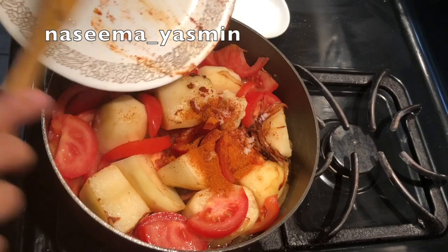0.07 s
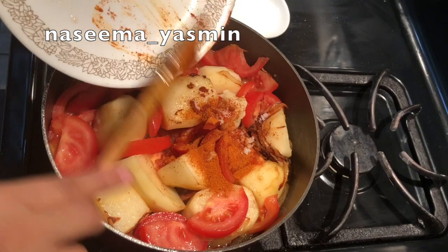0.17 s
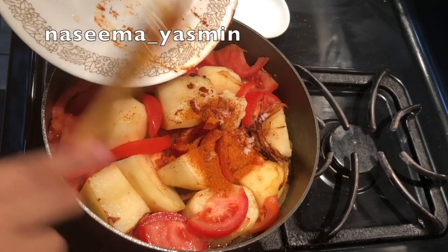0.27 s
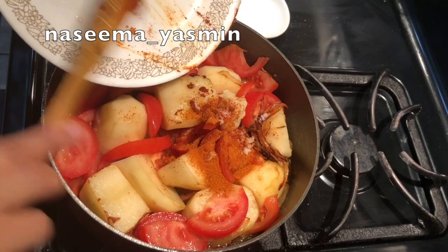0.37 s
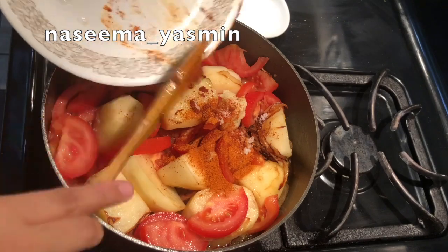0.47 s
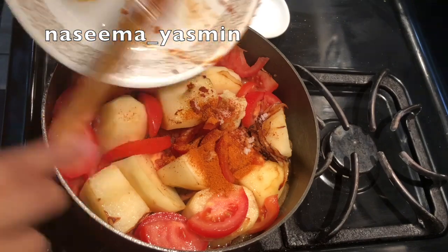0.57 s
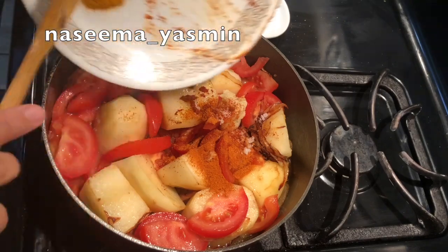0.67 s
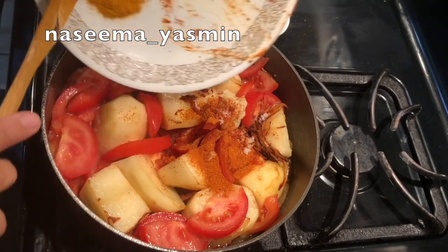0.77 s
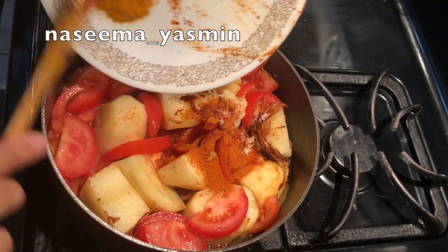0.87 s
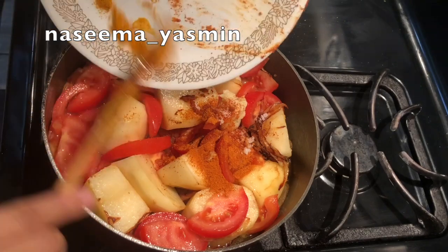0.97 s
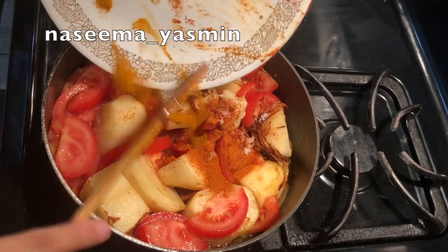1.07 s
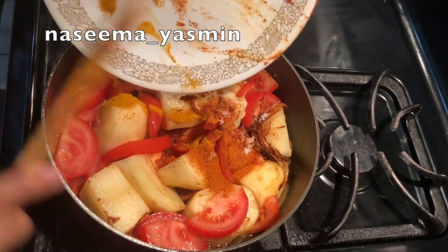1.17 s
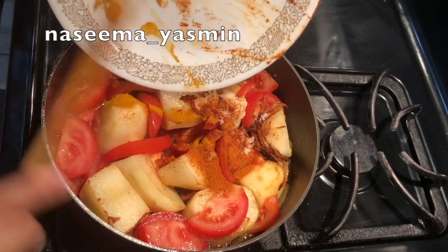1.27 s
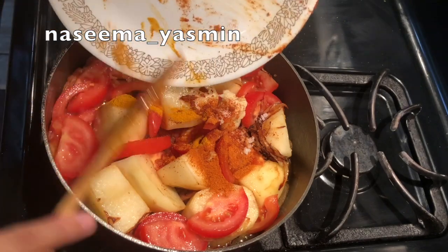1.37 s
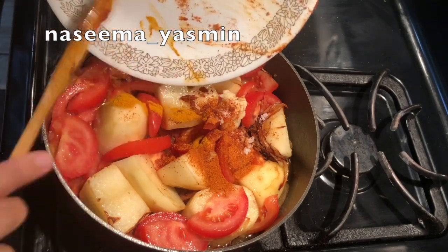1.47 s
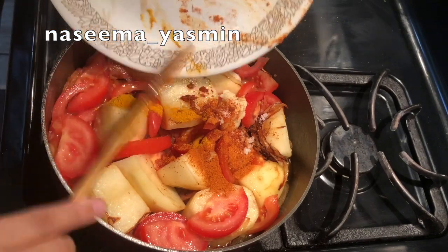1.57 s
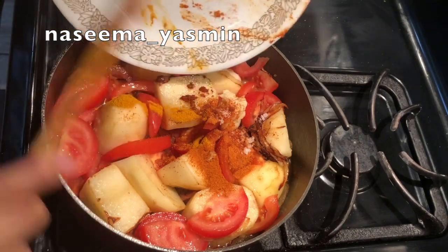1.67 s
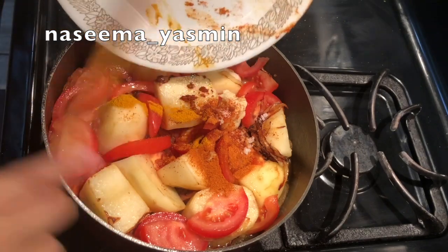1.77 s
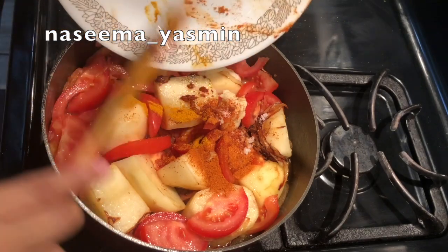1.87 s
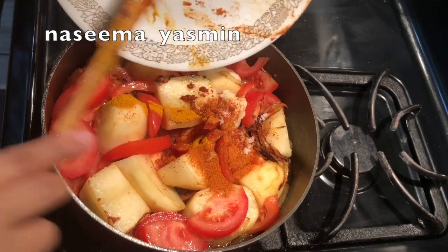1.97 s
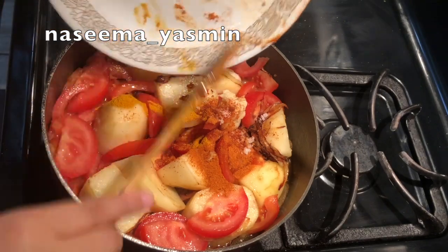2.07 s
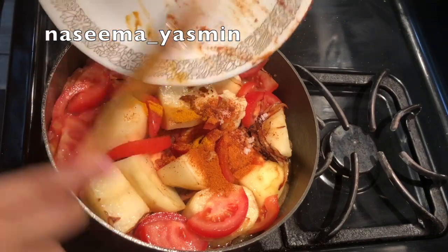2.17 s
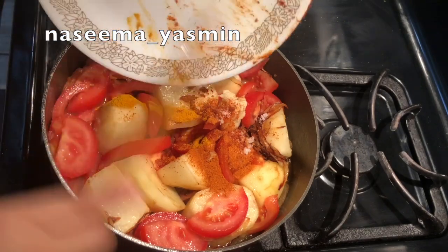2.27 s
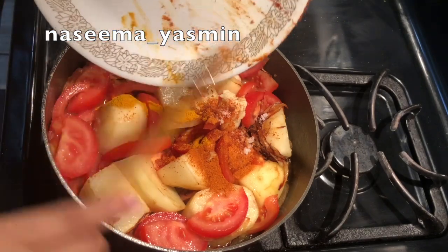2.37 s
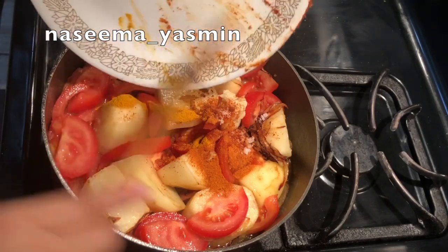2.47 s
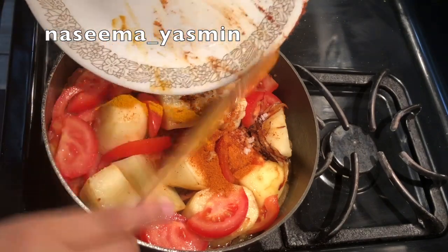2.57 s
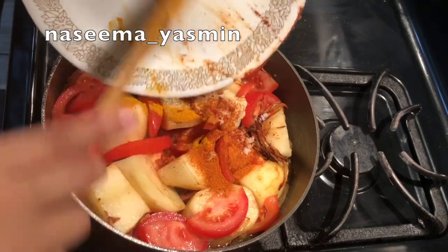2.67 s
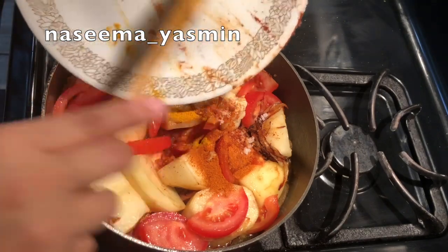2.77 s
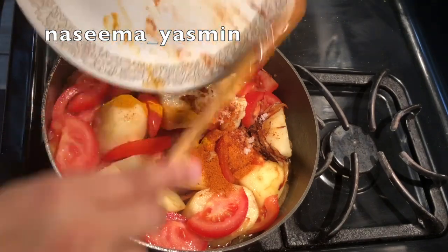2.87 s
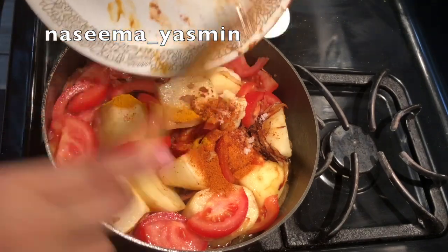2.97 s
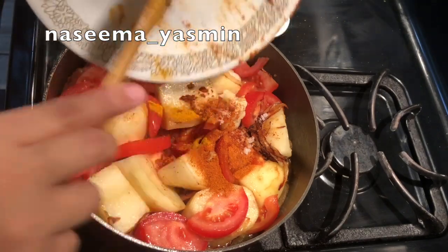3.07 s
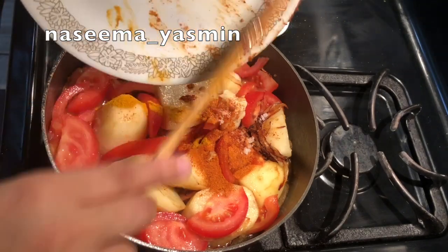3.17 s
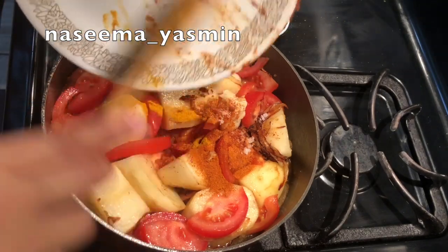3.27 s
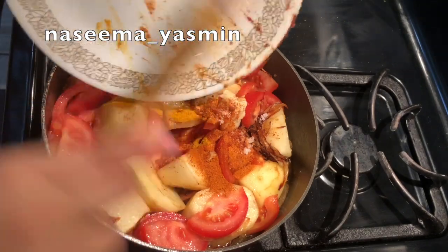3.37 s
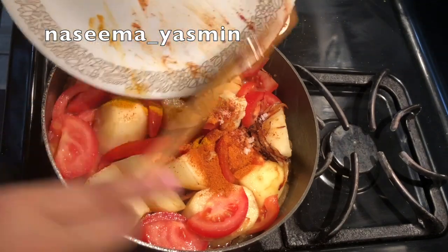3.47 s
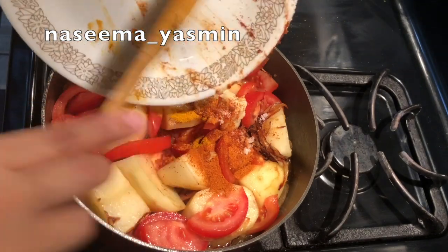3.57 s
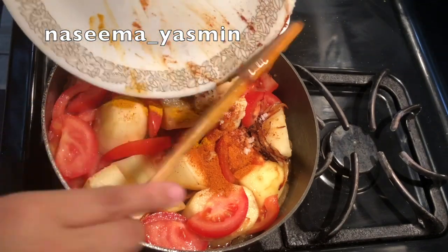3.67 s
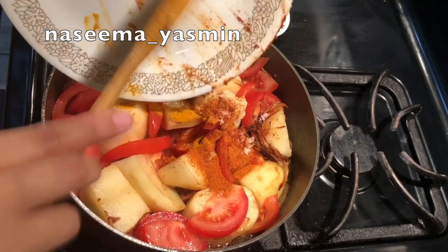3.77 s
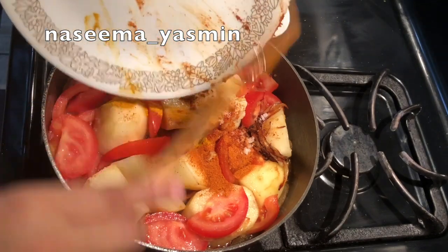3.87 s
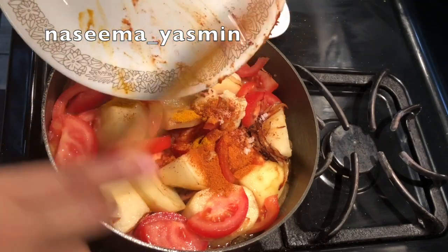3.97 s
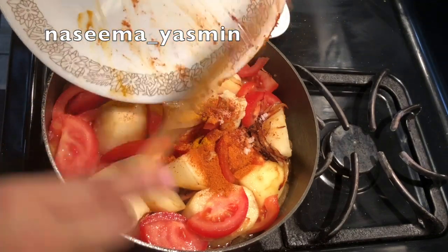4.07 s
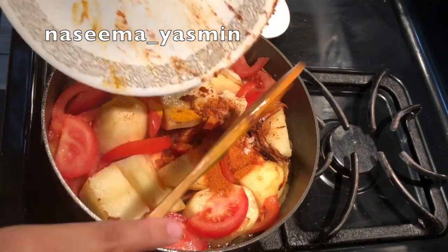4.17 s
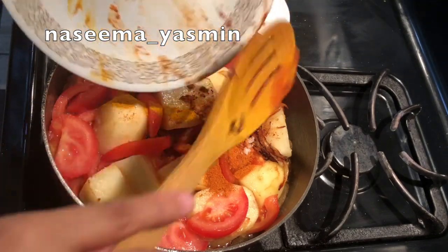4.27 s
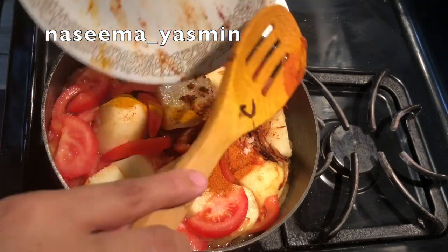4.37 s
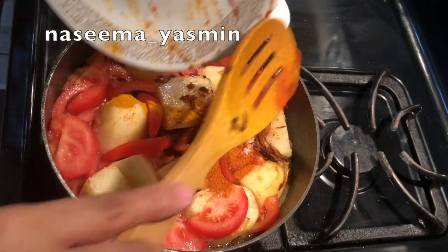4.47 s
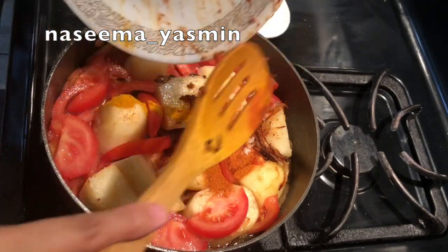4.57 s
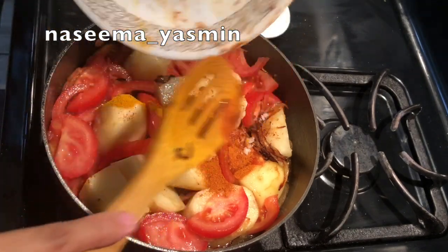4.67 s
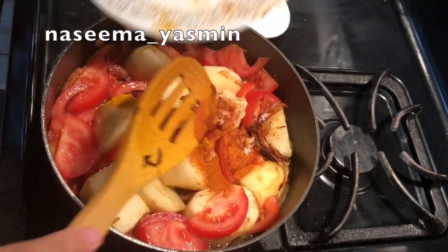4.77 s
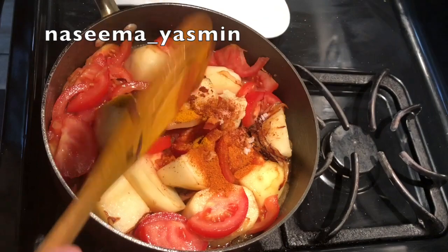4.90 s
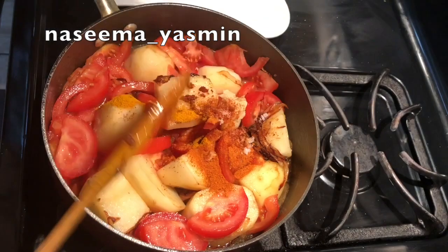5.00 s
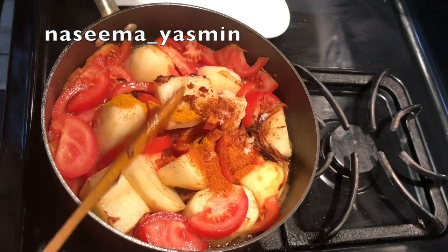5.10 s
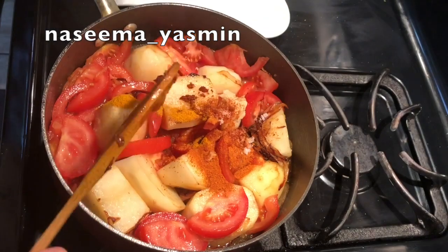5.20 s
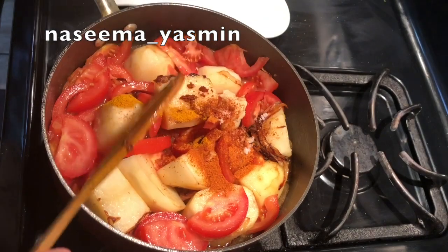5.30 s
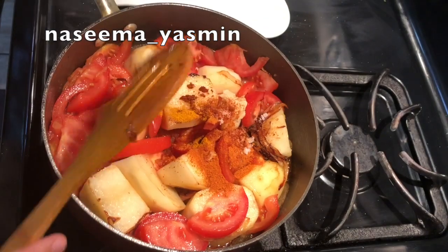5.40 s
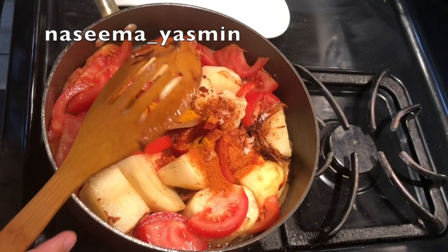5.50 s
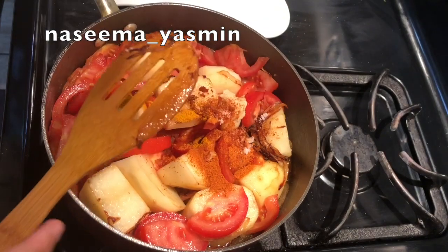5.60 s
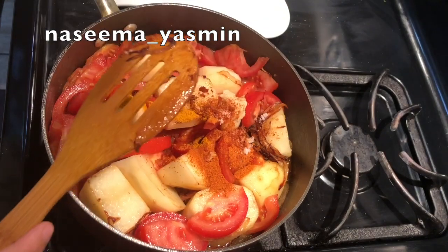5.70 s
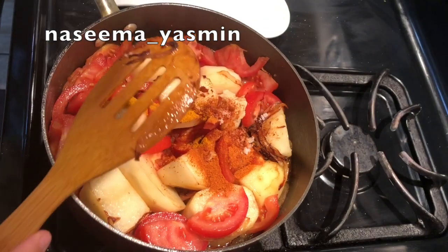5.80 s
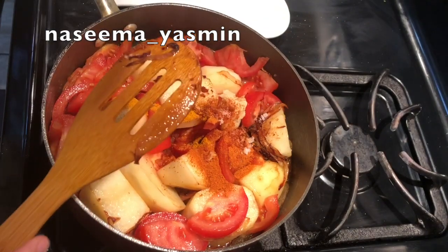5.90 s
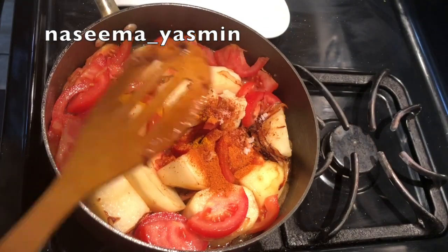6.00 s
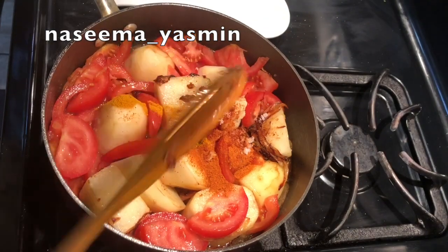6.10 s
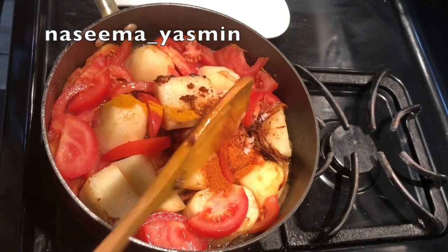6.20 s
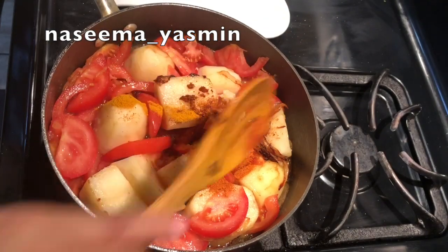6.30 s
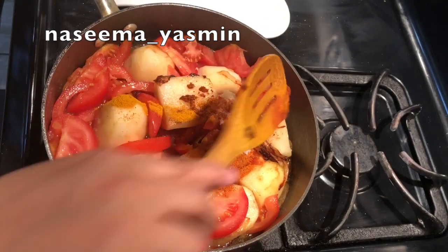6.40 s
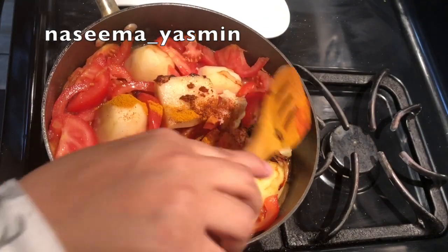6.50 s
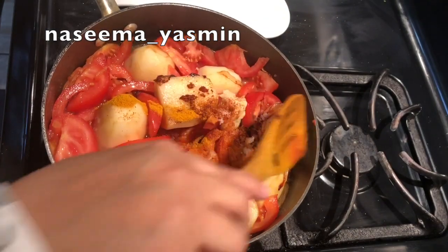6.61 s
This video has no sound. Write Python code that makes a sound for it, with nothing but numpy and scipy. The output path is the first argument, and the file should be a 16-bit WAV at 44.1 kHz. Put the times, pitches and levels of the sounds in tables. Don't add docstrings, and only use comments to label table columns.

```python
import sys
import numpy as np
from scipy import signal
from scipy.fft import rfft, irfft, next_fast_len
from scipy.io import wavfile
from scipy.ndimage import uniform_filter1d

SR = 44100
rng = np.random.default_rng(int(sys.argv[2]) if len(sys.argv) > 2 else 0)


def to_wav(s):
    ch = np.atleast_2d(s).T
    pcm = np.round(np.clip(ch, -1, 1) * 32767)
    wavfile.write(sys.argv[1], SR, pcm.astype(np.int16))


def field_ratio(decibels):
    return 10 ** (np.asarray(decibels, dtype=float) / 20)


N = 293255
CONTACT_DELAY_S = 0.00153
PRESS_DB_PER_S = 2200

# start_s, click_db, first_ring_db, second_ring_db, wood_db
TAP_EVENTS = [(0.132, -9, -13, -30, -34.5), (0.438, -8, -11, -28, -34), (1.292, -19, -29, -57, -30),
              (1.561, -12, -12, -29.5, -27), (1.809, -26, -7, -34.5, -25.5),
              (2.006, -2.5, -13, -25.5, -29.5), (2.125, -20, -27, -47, -58), (2.276, -26, -37, -45, -29.5),
              (2.369, -38, -26, -51, -62), (2.526, -6, -13, -18, -24), (2.65, -6, -42, -46, -41),
              (2.808, -47, -30.5, -54, -31.5), (3.164, -8.5, -22, -38, -27), (3.24, -31, -29.5, -53, -56),
              (3.387, -6.5, -22.5, -36, -29.5), (3.639, -31, -38, -35, -30), (3.701, -35, -23, -59, -62),
              (3.87, -29, -28.5, -47, -28.5), (4.031, -25, -38, -62, -49), (4.123, -10, -12, -46, -28),
              (4.449, -29, -26.5, -40, -44)]
# start_s, peak_db
KNOCK_EVENTS = [
    (5.205, -17),
    (5.334, -17.5),
    (6.587, -35),
]
# pitch_hz, level_db, t60_s
WOOD_MODES = [(175, -9, 0.013), (210, -30, 0.012), (300, -18, 0.021), (358, 5, 0.017), (434, 7.5, 0.022),
              (490, -2, 0.011), (590, 1, 0.024), (752, 3, 0.01), (799, 8, 0.013), (1040, 3, 0.01)]


def highpass(x, order, cut_hz):
    return signal.sosfilt(signal.butter(order, cut_hz, "highpass", fs=SR, output="sos"), x)


def band(x, lo_hz, hi_hz):
    sos = signal.butter(2, [lo_hz, min(hi_hz, .45 * SR)], "bandpass", fs=SR, output="sos")
    y = signal.sosfilt(sos, x)
    return y / np.sqrt(np.mean(y ** 2))


def walk(rate_hz):
    hold = int(SR / rate_hz)
    steps = np.repeat(rng.standard_normal(N // hold + 1), hold)
    return 1.546 * uniform_filter1d(steps, hold)[:N]


def grains(spread_db):
    size_db = spread_db * np.minimum(rng.exponential(size=N), 6)
    x = rng.standard_normal(N) * field_ratio(size_db)
    return x / np.sqrt(np.mean(x ** 2))


def decay(t, t60_s):
    return np.exp(-np.log(1000) * t / t60_s)


def tone(hz):
    return np.sin(2 * np.pi * np.cumsum(hz) / SR)


def ring(force, modes, low_hz=200):
    out = np.zeros(len(force))
    for hz, db, t60_s in modes:
        pole = np.exp(2j * np.pi * hz / SR - np.log(1000) / (t60_s * SR))
        out += field_ratio(db) * signal.lfilter([1], [1, -pole], force).imag
    return highpass(out, 3, low_hz)


def strike(out, s, modes, db, scatter_db=12.0, cycles=1.0, lag=0., crack=0., crack_s=0.005,
           buzz_db=0., loose=1.0):
    hz, mode_db, t60_s = np.transpose(modes)[:, :, None]
    t60_s = np.minimum(t60_s, .4)
    t = np.arange(min(int((t60_s.max() + .02) * SR), N - int(s * SR))) / SR
    share, detune, phase = rng.standard_normal((3, len(modes), 1))
    since = np.maximum(t - lag / hz, 0)
    swell = (1 - np.exp(-since * hz / cycles)) * decay(since, t60_s)
    buzz = np.repeat(rng.standard_normal((len(modes), 100)), 200, axis=1)
    buzz = uniform_filter1d(buzz, size=150, axis=1)[:, :len(t)]
    swell = swell * field_ratio(np.clip(buzz_db * buzz, -14, 4) * np.minimum(t / 0.0057, 1))
    wave = np.sin(2 * np.pi * hz * (1 + 0.0017 * detune) * since + loose * phase)
    x = np.sum(field_ratio(mode_db + scatter_db * share) * swell * wave, axis=0)
    x += crack * rng.standard_normal(len(t)) * np.exp(-t / crack_s)
    out[int(s * SR):int(s * SR) + len(t)] += field_ratio(db) * x


def rattle(s, bands, db, cycles=0.58, tilt_db=0., below=1.21, above=1.293):
    out, t = np.zeros(N + SR), np.arange(int(.4 * SR)) / SR
    for hz, band_db, t60_s in bands:
        swell = (1 - np.exp(-t * hz / cycles)) * decay(t, t60_s)
        noise = band(rng.standard_normal(len(t)), hz / below, hz * above)
        total_db = db + band_db + tilt_db * np.log2(hz / 1000)
        out[int(s * SR):int(s * SR) + len(t)] += field_ratio(total_db) * swell * noise
    return out[:N]


def sizzle():
    # time_s, level_db
    lively = [(0, 1.3), (.85, 0), (2.0, 2.5), (2.4, 1), (2.72, 2), (3.4, -1), (4.7, 0.5), (5.26, 4.5),
              (5.56, 3), (6.22, 3), (6.44, 3), (6.65, -0.5)]
    # pitch_hz, level_db_per_hz
    colour = [(41, -14), (70, -2), (123, -1.5), (208, -7), (350, 1), (481, -2.5), (603, -2), (691, -0.5),
              (887, -1), (1280, 0), (1600, -2.5), (3870, -2.5), (7140, -9), (9000, -12.5), (11000, -12.5),
              (13000, -19.5), (15800, -24.5)]
    # pitch_hz, width_hz, level_db
    pot_air = [(880, 40, 3), (1192, 38, -1), (1664, 44, 6.5), (2350, 480, -4.5), (3440, 650, -8.5),
               (3700, 150, -3), (5000, 200, -6), (7500, 250, -6), (10800, 500, -3)]
    lively_db = np.interp(np.arange(N) / SR, *np.transpose(lively))
    body_db, spray_db = 1.5 + 0.4 * lively_db, -4 + lively_db
    size = next_fast_len(N)
    fizz = rfft(grains(1.6), size)
    hz = np.maximum(np.arange(len(fizz)) * SR / size, 20)
    octave = np.log2(hz)
    air = 1 + sum(0.82 * field_ratio(db) / (1 + (2 * (hz - f) / width_hz) ** 2) for f, width_hz, db in pot_air)
    colour_hz, colour_db = np.transpose(colour)
    fizz = fizz * air * field_ratio(np.interp(octave, np.log2(colour_hz), colour_db))
    spray = np.abs(walk(60))
    out = np.zeros(N)
    for centre in np.arange(5, 14.5, .5):
        share = np.cos(np.pi * np.clip(octave - centre, -.5, .5)) ** 2
        high = np.clip((centre - 11.6) / 0.84, 0, 1)
        db = (1 - high) * body_db * np.clip(centre - 9, 0, 1) + high * (spray_db + 1.35 * spray)
        db = db + 1.47 * walk(25) + 2.72 * high * np.abs(walk(110))
        out += field_ratio(db) * irfft(fizz * share, size)[:N]
    return field_ratio(-38.5) * out


def hum():
    # pitch_hz, level_db
    hum_lines = [(59.2, -65.5)]
    t = np.arange(N) / SR
    return sum(np.sqrt(2) * field_ratio(db + 1.3 * walk(9.1)) * np.sin(2 * np.pi * hz * t) for hz, db in hum_lines)


def squeaks():
    # start_s, held_s, pitch_hz, level_db
    squeak_events = [(.18, 0.015, 1460, -30), (.172, 0.059, 2204, -40.5), (.187, 0.032, 3700, -44),
                     (.188, 0.015, 4000, -41.5), (0.18, 0.016, 4780, -41.5), (0.13, .012, 4900, -43),
                     (1.295, 0.0075, 4780, -40.5), (2.529, .014, 3620, -34), (2.529, .005, 4010, -32),
                     (2.529, .004, 5350, -37), (.472, .008, 3600, -40), (.475, .03, 2190, -48),
                     (.99, 0.045, 1400, -39.5), (1.59, 0.089, 2184, -42.5), (1.598, .012, 400, -39),
                     (1.642, .012, 1600, -38), (2.55, 0.057, 2250, -38), (3.88, 0.03, 2200, -47),
                     (1.848, 0.019, 1380, -36), (1.85, 0.032, 2220, -39.5), (2.075, 0.033, 2200, -39),
                     (2.36, .05, 2165, -42), (2.94, 0.036, 1040, -38), (2.925, 0.025, 1022, -39),
                     (2.915, 0.028, 640, -43.5), (2.93, .03, 2160, -48), (3.44, 0.014, 1100, -35),
                     (3.473, 0.011, 540, -38.5), (3.65, 0.04, 2190, -37), (3.703, 0.013, 1050, -36),
                     (3.928, 0.017, 1020, -35.5), (4.15, 0.0097, 2190, -43)]
    out, waver, flutter = np.zeros(N), walk(300), walk(160)
    for s, held_s, hz, db in squeak_events:
        at = np.arange(int((s - .03) * SR), int((s + held_s + .06) * SR))
        slack_db = PRESS_DB_PER_S * np.maximum(s - at / SR, 0)
        slack_db += 1400 * np.maximum(at / SR - s - held_s, 0)
        late = at + int(hz)
        out[at] += field_ratio(db - slack_db + 2.5 * flutter[late]) * tone(hz * (1 + .012 * waver[late]))
    return out


def thud(s, db):
    start_hz, fall_s, rise_s, fade_s = 1150, .0022, .003, .0015
    out, t = np.zeros(N), np.arange(int(.04 * SR)) / SR
    turns = start_hz * fall_s * np.log(1 + t / fall_s)
    shape = (t / rise_s) ** 2 * np.exp(-t / fade_s)
    swoop = shape / shape.max() * np.sin(2 * np.pi * turns)
    out[int(s * SR):int(s * SR) + len(t)] = field_ratio(db) * swoop
    return out


def taps():
    # pitch_hz, level_db, t60_s
    plate_low = [(1228, 0, .056), (1255, -6, .045), (1390, -16, .035), (1080, -10, .03)]
    plate_second = [(2175, 0, 0.095), (2198, 1.5, 0.067), (1600, 15, 0.011)]
    plate_high = [(3585, 10.5, 0.065), (4010, 13.5, 0.035), (4750, 13, 0.014), (5160, 2, 0.054),
                  (6060, -6, 0.023), (7700, 8.5, 0.014)]
    # pitch_hz, level_db, t60_s
    blade_bands = [(800, -4, .04), (1640, 0, 0.046)]
    # start_s, level_db, pitch_hz
    slaps = [(0.133, -40, 708), (0.438, -38, 694), (1.29, -26.5, 800), (1.563, -15, 896),
             (1.81, -14.5, 740), (2.007, -26, 760), (2.277, -35, 894), (2.527, -24, 858), (2.651, -22, 955),
             (2.808, -41, 853), (3.166, -25.5, 713), (3.39, -26, 891), (3.641, -22.5, 880),
             (3.872, -33, 820), (4.033, -28.5, 900), (4.125, -11.5, 954)]
    click = [(1833, -2.5, 0.01), (980, -7, 0.0021), (690, -8.0, 0.019)]  # pitch_hz, level_db, t60_s
    out = np.zeros(N)
    for s, peak_db, first_db, second_db, wood_db in TAP_EVENTS:
        s = s + CONTACT_DELAY_S
        edge_db = max(-12 + 0.6 * second_db, -39)
        strike(out, s, plate_low, first_db + 2.5, scatter_db=2.5)
        strike(out, s, plate_second, second_db + 2.0, scatter_db=1.2, buzz_db=3.5)
        strike(out, s, WOOD_MODES, wood_db - 2.0, scatter_db=5.5, cycles=0.29, lag=0.84, loose=0.68)
        out += thud(s + 0.00024, wood_db + 7.5)
        strike(out, s, plate_high, edge_db - 15.5, scatter_db=2.0, crack=3.9, crack_s=0.0014, buzz_db=9.0)
        out += rattle(s, blade_bands, first_db - 16.5, cycles=1.7)
        strike(out, s, click, peak_db - 12.5, scatter_db=-0.5, cycles=0.12, lag=0.68, loose=0.13)
    for s, db, hz in slaps:
        strike(out, s + 0.0013, [(hz, 0, .018)], db + 4.5, scatter_db=0.5, cycles=0.5, loose=0.)
    return out


def scrapes():
    # start_s, held_s, ring_db, grit_over_ring_db, rumble_over_ring_db
    drags = [(0.164, 0.017, -38, -1, -32), (0.199, 0.03, -35, -6, -37), (0.479, 0.018, -39.5, 1.5, -10),
             (0.972, 0.017, -43.5, -20, -9), (.998, 0.02, -34, -28, -24), (1.331, 0.087, -48.5, 0, 3),
             (1.601, 0.049, -46, -18, -2), (1.644, 0.0084, -34, 0.5, -12), (1.844, 0.019, -42, -18, -24),
             (1.891, 0.0042, -43.5, 5, 1), (2.06, 0.047, -44.5, 3, -10), (2.124, 0.021, -30, -6, -9.5),
             (2.371, 0.012, -28, -19, -34), (2.574, .02, -41, -3, -18), (2.878, 0.034, -35, -9, -7),
             (2.91, 0.028, -31.5, -6, -17), (2.945, 0.01, -33, -6, -19), (3.222, 0.013, -39, -10, -10),
             (3.24, 0.015, -30.5, -9.5, -23), (3.413, 0.019, -44, 9, -12), (3.466, 0.023, -27.5, -6.5, -28),
             (3.701, 0.02, -31.5, -5.5, -30), (3.931, 0.015, -22, -13, -30), (3.882, .02, -41, -12, -30),
             (4.04, .025, -44, -12, -20), (4.146, 0.0057, -28, -5, -25)]
    # pitch_hz, level_db, t60_s
    pressed_modes = [(1196, -3.5, 0.037), (1086, -1.5, 0.032), (1020, -1, 0.013), (1340, -17, 0.039),
                     (1510, -11, 0.04), (2154, -13.5, 0.13), (3690, -17, 0.028), (4740, -21, 0.15)]
    # pitch_hz, level_db, t60_s
    rasp_modes = [(3620, 1, .03), (4040, 0, 0.022), (4780, 1.5, 0.03), (5440, -1.5, .025),
                  (6070, -0.5, 0.031), (6380, -2, .02), (7460, -2.5, 0.022)]
    lift_db_per_s = 852
    slips = grains(2.) * field_ratio(2.5 * walk(70))
    rasp = ring(slips, rasp_modes)
    hiss = 0.78 * band(slips, 2900, 10200) + 0.63 * rasp / np.std(rasp)
    out, press, rumble = np.zeros((3, N))
    waver, flutter = walk(250), walk(120)
    for s, held_s, full_db, grit_db, rumble_db in drags:
        at = np.arange(int((s - .08) * SR), int((s + held_s + .1) * SR))
        slack_db = PRESS_DB_PER_S * np.maximum(s - at / SR, 0)
        slack_db += lift_db_per_s * np.maximum(at / SR - s - held_s, 0)
        ring_db = full_db - slack_db
        chatter_hz = 1244.5 - 9.71 * s
        press[at] += field_ratio(ring_db)
        rumble[at] += field_ratio(ring_db + rumble_db)
        out[at] += field_ratio(ring_db + grit_db - 6.0) * hiss[at]
        out[at] += field_ratio(ring_db + 3.5 + 1.2 * flutter[at]) * tone(chatter_hz * (1 + .009 * waver[at]))
    out += field_ratio(-35) * ring(press * slips, pressed_modes)
    return out + field_ratio(-33.0) * ring(rumble * slips, WOOD_MODES, 325)


def spits():
    # centre_s, peak_db, length_s
    sprays = [(0.194, -35, 0.012), (0.223, -34, 0.012), (1.643, -23, 0.0087), (1.712, -23.5, 0.0079),
              (1.795, -32, 0.014), (1.8856, -35, 0.013), (1.919, -34, 0.015), (2.082, -31, 0.017),
              (2.87, -48, 0.012), (2.914, -39, 0.017), (3.031, -33, 0.022), (3.077, -33, 0.011),
              (3.47, -31, 0.015), (4.412, -26.5, 0.011), (4.45, -23, 0.0082), (4.747, -30, 0.0037),
              (4.897, -34, .003), (5.093, -31, 0.003), (5.102, -26, .003), (5.129, -26, 0.013),
              (5.168, -32, .003), (0.743, -29, .005), (1.394, -28, .005), (1.476, -36, 0.0046),
              (4.516, -32, .01), (4.934, -36, .015), (5.045, -36, .015), (5.456, -28, 0.0088),
              (5.638, -24, 0.004), (5.94, -32, 0.0036), (6.178, -30, 0.012), (6.3589, -30.5, 0.018),
              (6.434, -26, 0.0081), (6.469, -28, 0.035)]
    puffs = [(s, -31 + 0.23 * db, 0.014) for s, db, *_ in [*TAP_EVENTS, *KNOCK_EVENTS]]
    out, drops, t = np.zeros(N), grains(3.5), np.arange(N) / SR
    mist = band(drops, 8600, 12300) + .3 * band(drops, 7100, 14000)
    for s, peak_db, length_s in [*sprays, *puffs]:
        at = slice(int(s * SR), int((s + .1) * SR))
        shape = np.exp(-(np.abs(t[at] - s) / max(length_s, .002)) ** 1.5)
        out[at] += field_ratio(peak_db - 17.5) * mist[at] * shape
    return out


def bubble():
    # start_s, level_db, decay_s
    burst = (4.449, -19, 0.0049)
    out = np.zeros(N)
    strike(out, burst[0], [(6180, -1, 0.015)], burst[1], scatter_db=0.5, crack=0.47, crack_s=burst[2])
    return out


def lone_rings():
    # start_s, pitch_hz, level_db, t60_s
    ring_events = [(5.944, 150, -25, 0.29), (6.03, 170, -25.5, 0.19), (6.08, 260.4, -24.5, 0.34),
                   (6.07, 720, -17, 0.1), (5.934, 5300, -30, 0.037), (4.6, 2300, -24.5, 0.057),
                   (5.963, 4900, -29, .06), (5.975, 2200, -26.5, 0.11), (6.02, 4500, -30, .04),
                   (5, 11000, -39, 0.038), (6.045, 4400, -21.5, .1), (6.08, 3660, -22, 0.16),
                   (6.064, 900, -19, .05), (6.064, 5450, -24, .1), (5.669, 7200, -17, .05),
                   (5.669, 10100, -22, .04), (5.685, 260, -20, .12), (6.2, 100, -40, .4)]
    out = np.zeros(N)
    for s, hz, db, t60_s in ring_events:
        strike(out, s, [(hz, 0, t60_s)], db, scatter_db=0., cycles=1.7, buzz_db=3.5)
    return out


def knocks():
    # pitch_hz, level_db, t60_s
    pot_modes = [(162, -2.5, .15), (368, -2, 0.13), (686, -1, 0.069), (783, 2, .12), (910, -8.5, 0.14),
                 (1104, -7, 0.19), (1400, -2, 0.13), (1727, -3, 0.12), (2350, -7, .035), (2700, -19, 0.14),
                 (2960, -29, .16), (3260, -19, .25), (3740, -18, .2)]
    # band_hz, level_db, t60_s
    pot_bands = [(78.6, -19, 0.61), (135, -11.5, 1), (277, -3.5, 0.46), (437, 0.5, 0.23), (716, 0, 0.21),
                 (1360, 3.5, 0.15), (2480, -6, 0.21), (4800, -9, 0.19)]
    contact = [(582, 0.22, 0.038), (980, -0.18, 0.0081), (1380, -2, .02), (1764, -1.7, 0.029)]
    out = np.zeros(N)
    for s, peak_db in KNOCK_EVENTS:
        strike(out, s, pot_modes, peak_db - 9.5, scatter_db=2.0, buzz_db=2.5)
        strike(out, s + CONTACT_DELAY_S, contact, peak_db, scatter_db=2.5, lag=0.91)
        out += rattle(s, pot_bands, peak_db - 13.5)
    return out


def clatter():
    # start_s, peak_db, china_db, counter_db
    drop_events = [
        (5.668, 6.5, -12.5, -13),
        (5.7792, 4.5, -15.5, -13.5),
        (5.8175, 3, -19, -20.5),
        (5.839, -27, -47, -24),
        (5.934, -20, -24.5, -33),
        (5.962, -7.5, -25.5, -38),
        (6.019, -12, -25, -26),
        (6.033, -31, -19.5, -23.5),
        (6.063, -9, -13, -21),
        (6.078, -16, -34, -29),
    ]
    # pitch_hz, level_db, t60_s
    china_modes = [(1233, -4, 0.47), (1760, -11.5, 0.21), (2385, -11.5, 0.25), (2190, -11, 0.37),
                   (3180, -8, 0.24), (3590, -2.5, 0.17), (3640, -7, 0.25), (4190, -3, 0.14),
                   (4100, -4, 0.22), (4870, -15, 0.13), (5420, -18, 0.37), (5990, -10, 0.25),
                   (6960, -10, 0.35), (5550, -13, 0.3), (7040, -8.5, 0.24), (7600, -15, 0.17),
                   (7811, -17, 0.18), (8900, -20, 0.086), (9000, -21, 0.087), (9700, -13.5, 0.15),
                   (10790, -25, 0.075), (10050, -24, 0.073), (13000, -19, 0.13), (14800, -24, .12)]
    # pitch_hz, level_db, t60_s
    rocking_modes = [(1234, -6.5, 0.28), (1850, -13, 0.14), (2030, -4, 0.095), (2184, -1, 0.21),
                     (2620, -11, 0.086), (3080, -14, 0.1), (3600, -4.5, 0.26), (3700, -11, 0.11),
                     (4980, -16, 0.15), (4100, -2, 0.1), (4200, -10, 0.08), (5560, -6, 0.11),
                     (4790, -9.5, 0.18), (5400, -5.5, 0.14), (6250, -26, 0.12), (7095, -5, 0.083),
                     (7400, -15, 0.11), (9125, -9, 0.074), (8710, -23, 0.091), (10700, -25, 0.11),
                     (12000, -26, .12), (13170, -18, 0.087), (14830, -25, .1)]
    # pitch_hz, level_db, t60_s
    counter_modes = [(106, -8, 0.11), (157, -8.5, 0.29), (262.3, 1.5, 0.18), (289, 0, 0.13),
                     (401, -10.5, 0.23), (639, -6, 0.1), (679, -15.5, 0.14), (739, -11.5, 0.16),
                     (904, -15, 0.15)]
    # band_hz, level_db, t60_s
    china_bands = [(584, 1, 0.21), (895, 1, 0.17), (1510, -1, 0.24), (2660, -2.5, 0.23), (4300, -10, 0.34),
                   (5900, 1.5, 0.15), (8600, -8, 0.24), (13500, -19, 0.18)]
    # band_hz, level_db, t60_s
    china_clusters = [(7360, 3, 0.1), (8900, -8, .13), (9470, -10, 0.17), (10300, -9, 0.073),
                      (10800, -6, 0.087), (12100, -13, 0.11), (13440, -11, .15), (13750, -19, .12),
                      (14600, -19, .13), (15300, -17, .12)]
    contact = [(5990, 9, 0.019), (3680, 5.0, 0.014), (7900, -14, 0.036), (8970, 2.0, 0.019)]
    out = np.zeros(N)
    for k, (s, peak_db, china_db, counter_db) in enumerate(drop_events):
        s = s + 0.001193
        flat = k < 4
        modes = china_modes if k < 6 else rocking_modes
        strike(out, s, modes, china_db - (7 if flat else 5.5), scatter_db=2., buzz_db=5.)
        strike(out, s + 0.00286, counter_modes, counter_db - 0.5, scatter_db=1.5, cycles=3.3, buzz_db=4.0)
        strike(out, s, contact, peak_db - 18.5, scatter_db=-2.0)
        out += rattle(s, china_bands, china_db - (5.5 if flat else 8.2), cycles=15.3,
                      tilt_db=0 if flat else -1.6)
        out += rattle(s - .0015, china_clusters, china_db - (6 if flat else 15), cycles=3.5,
                      below=1.014, above=1.014)
    return out


def room(near):
    t60_s, level_db, top_hz = 0.22, -17, 9000
    t = np.arange(int(.5 * SR)) / SR
    tail = band(rng.standard_normal(len(t)), 100, top_hz) * decay(t, t60_s) * (t > .004)
    return field_ratio(level_db) * signal.fftconvolve(near, tail / np.sqrt(np.sum(tail ** 2)))[:N]


def scene():
    held = highpass(taps(), 2, 105)
    near = held + squeaks() + scrapes() + lone_rings() + knocks() + clatter()
    frying = sizzle() + spits() + bubble()
    return (near + room(near) + frying + hum())[None]


def top_cut(x):
    return signal.sosfilt(signal.butter(12, 17020, fs=SR, output="sos"), x)


def record(dry):
    low_hz, top_hz, ceiling = 30, 15740, .95
    x = highpass(dry, 2, low_hz)
    x = ceiling * np.tanh(x / ceiling)
    x = signal.sosfilt(signal.ellip(8, .2, 50, top_hz, fs=SR, output="sos"), x)
    return top_cut(x)


dry = scene()
out = record(dry)
to_wav(out)
```